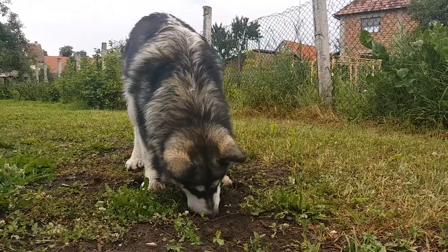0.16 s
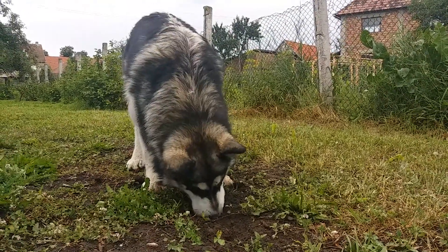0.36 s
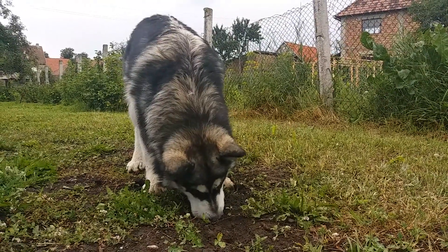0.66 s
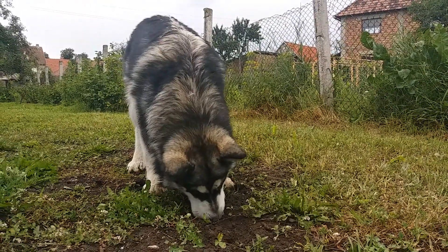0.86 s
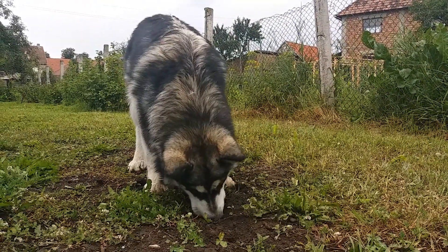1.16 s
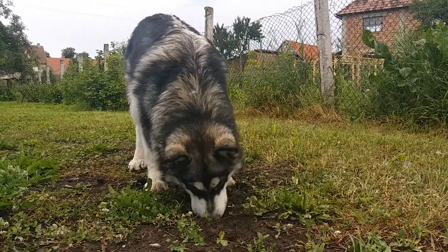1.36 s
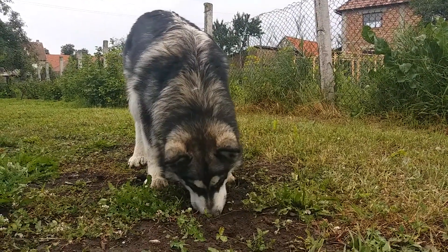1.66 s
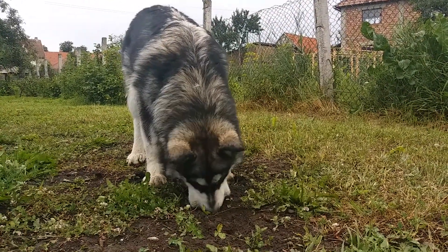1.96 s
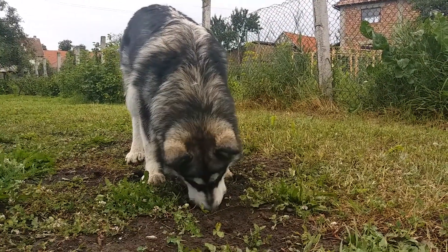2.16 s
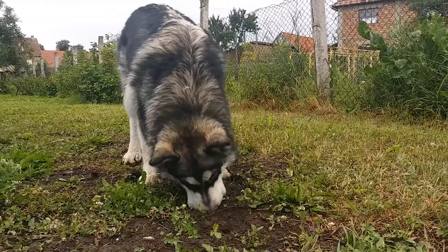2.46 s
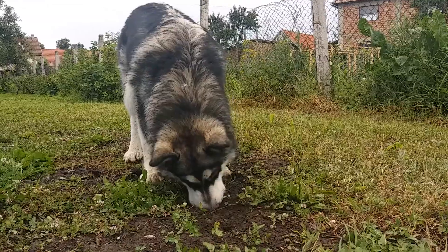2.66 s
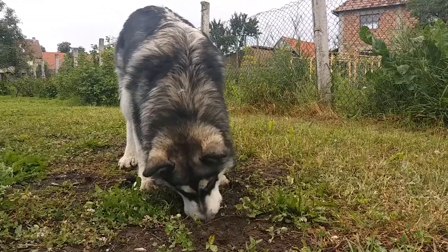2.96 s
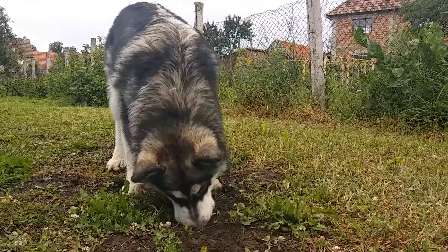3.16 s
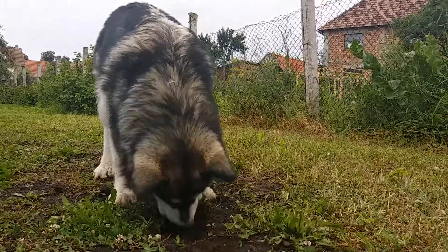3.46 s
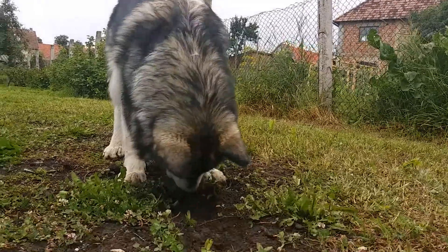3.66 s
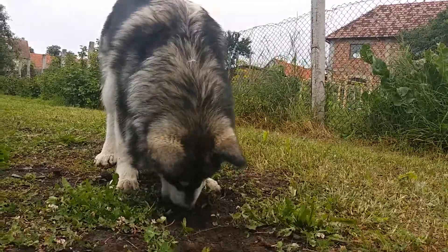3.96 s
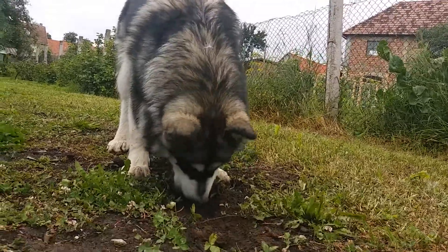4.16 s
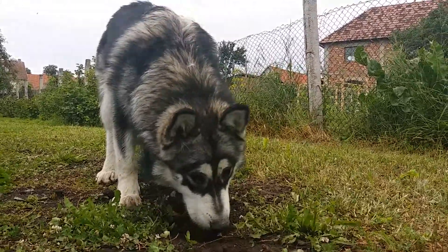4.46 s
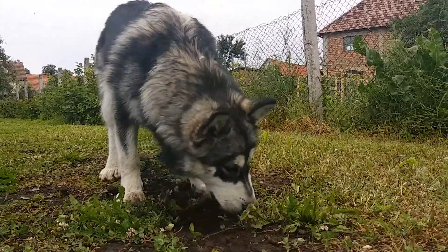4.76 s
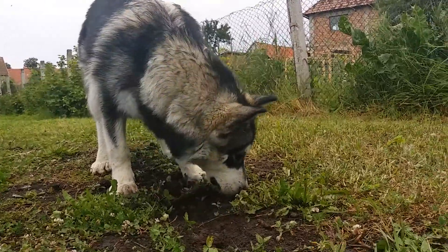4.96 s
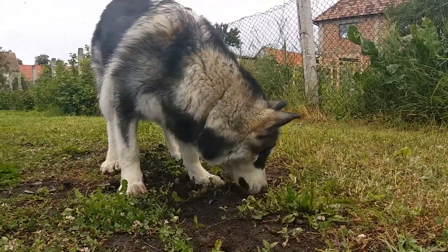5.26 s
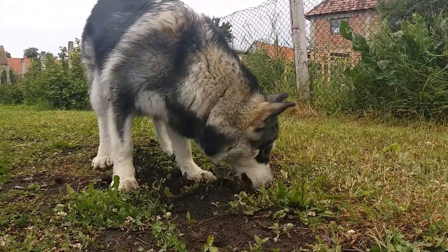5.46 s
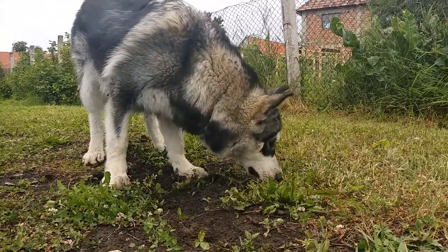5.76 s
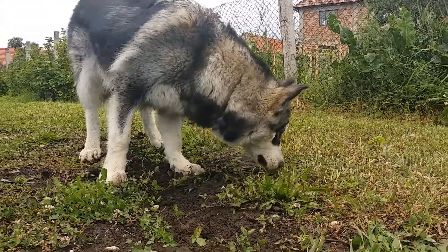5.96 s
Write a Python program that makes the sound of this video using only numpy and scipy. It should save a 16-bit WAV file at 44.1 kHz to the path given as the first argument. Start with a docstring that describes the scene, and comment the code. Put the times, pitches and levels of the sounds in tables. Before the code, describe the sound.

Very close stereo microphone in a yard as a dog sniffs in soil. Soft wide hiss and barely audible low puffs come first, then isolated dull thuds. From about three seconds, rapid bassy thuds buffet the left side, building to a loud, torn snort on the right that ends in a thin hiss. After a brief lull, irregular low thuds continue to the end, with faint dry ticks.

```python
"""Soft, wide hiss and low, churning air, then thuds and a loud rush: wind buffets two microphone ports.
Eddies cross the ports, pull and push the pressure into thuds and leave churning wakes, mostly on the left.
Gusts hit the right port as shaped noise with random crackle; the strongest, a loud rush, ends in a thin hiss.
Faint dry ticks are short sine clicks. The recorder turns down all but the bass when the scene falls quiet."""
import sys
import numpy as np
from scipy import signal
from scipy.fft import rfft, irfft, next_fast_len
from scipy.io import wavfile

SR = 44100
rng = np.random.default_rng(int(sys.argv[2]) if len(sys.argv) > 2 else 0)


def bounce(signal):
    """Save signal as a 16-bit WAV file at the path given by the first command-line argument."""
    frames = np.transpose(np.atleast_2d(signal))
    limited = np.clip(frames, -1, 1)
    pcm = np.round(limited * 32767).astype(np.int16)
    wavfile.write(sys.argv[1], SR, pcm)


N = 269451
TIME = np.arange(N) / SR

# Eddies passing a port. Each row: centre in seconds, relative strength in dB, passing time in ms,
# port (0 left, 1 right).
EDDIES = [(0.7148,-14,2.3,0),(0.95,-28,2.4,0),(1.012,-38,2,1),(1.393,-21.5,1.4,0),(1.527,-24,1.86,0),
          (1.55,-26.5,2.34,0),(1.668,-19.5,1.7,0),(1.7647,-15.5,3.67,1),(1.822,-28.5,3.5,0),(1.852,-28.5,3.4,0),(1.9759,-26.5,1.95,0),
          (2.166,-27,3.7,0),(2.326,-20,1.42,0),(2.393,-6.5,1.77,0),(2.57,-34,3.7,0),(2.642,-30,1.5,0),(2.659,-24,2.14,0),
          (2.802,-17,3.4,1),(2.8639,-2,2,0),(2.917,-20.5,1.3,0),(2.965,-5,2.06,0),
          (3.041,-6,2.08,0),(3.057,-11,2.2,0),(3.091,-9.5,1.78,0),(3.156,-15.5,1.7,0),
          (3.232,-5.5,2.13,0),(3.285,-13,1.41,0),(3.3186,-9,1.95,0),(3.368,-11.5,1.9,0),
          (3.458,-7,2.1,0),(3.513,-15,1.9,0),(3.5571,-8,2.7,0),(3.583,-20,1.5,0),
          (3.657,-11,2.04,0),(3.71,-18.5,1.55,0),(3.766,-14.5,1.6,0),
          (3.835,0.5,2.3,1),(3.856,-10,1,1),(3.8734,2,2.1,1),(3.895,-4.5,2.6,1),(3.907,-3,2.9,1),(3.95,-9,1.63,1),
          (3.985,-15.5,2.3,0),(4.015,-24,1.3,0),(4.079,-21,1.12,0),(4.126,-27.5,0.71,0),
          (4.201,-24,1.05,0),(4.286,-26,1.17,0),(4.457,-19,3.4,0),(4.487,-17,1.8,0),
          (4.519,-9,2.33,0),(4.534,-14.5,1.7,1),(4.563,-20,1.2,1),(4.588,-9,2.3,0),
          (4.637,-18,1.66,0),(4.697,-17,1.9,0),(4.712,-10.5,2.2,1),(4.7415,-10.5,2.15,0),
          (4.887,-4,2.74,0),(4.887,-13.5,4.9,1),(4.908,-11,1.74,0),(4.923,-14,1.2,1),(4.95,-6,2.3,0),
          (4.979,-9.5,7.2,1),(5.003,-19.5,2.1,0),(5.087,-9,2.25,0),(5.116,-16.5,1.86,0),(5.1605,-3,2.46,0),
          (5.162,-12,3.4,1),(5.206,-18.5,1.95,0),(5.257,-5,2.05,0),(5.297,-13,1.68,0),(5.336,-7,2.2,0),
          (5.369,-19,1.33,0),(5.395,-3.5,2.15,0),(5.4471,-10,1.67,0),(5.487,-9,2.9,0),
          (5.657,-2.5,2.1,0),(5.751,-8,2,0),(5.7586,-13.5,1.95,1),(5.777,-13,2.4,0),
          (5.89,-14.5,1.58,0),(5.938,-4.5,2,0),(6.022,-4,2.25,0),(6.06,-13,1.52,0)]
# Soft puffs of slow air at the left port. Each row: peak in seconds, relative level in dB, half length in seconds.
PUFFS = [(0.031,-45,0.014),(0.178,-49,0.039),(0.403,-54,0.067),(0.533,-47.5,0.062),(1.477,-52,0.015),(1.549,-36.5,0.03),
         (1.839,-45.5,0.039),(1.995,-42.5,0.034),(2.189,-44,0.087),(2.68,-36,0.022),(3.24,-33.5,0.023),(4.092,-34,.025),(4.344,-38,0.033),(4.77,-38,.015),(5.78,-36,0.035)]
# Churning air at each port, weak at first, stronger and uneven after about 2.9 s.
# Each row: time in seconds, relative level in dB.
LEFT_CHURN = [(0,-57),(.65,-64),(.85,-57.5),(1.25,-67.5),(1.5,-58),(2.55,-65),(3.0,-40),(3.95,-41),(4.2,-49.5),(4.42,-47),(4.5,-34),(4.82,-47),
              (4.98,-45),(5.55,-43),(6.1,-42.5)]
RIGHT_CHURN = [(0,-67.5),(1.3,-65),(1.6,-63.5),(2.62,-65.5),(2.88,-35),(2.98,-57),(3.08,-37),(3.18,-44.5),(3.6,-39),
               (4.08,-37),(4.25,-55.5),(4.36,-35),(4.75,-33),(4.83,-50),(4.9,-29.5),(5.25,-38.5),(6.1,-37)]
# Gusts of fast air at the right port. Each row: peak in seconds, relative roar level in dB, rise in seconds,
# fall in seconds, relative hiss level in dB.
GUSTS = [(3.28,-57,0.038,.05,-62.5),(3.399,-50,0.016,0.019,-59),(3.49,-38,0.036,0.076,-48.5),(3.56,-53,0.027,0.035,-57),(3.64,-48,0.049,0.028,-56),
         (3.749,-43,0.092,0.042,-53.5),(3.882,-20.5,0.058,0.037,-34.5),(3.955,-39.5,.015,0.017,-58),(4.01,-37.5,0.036,0.044,-59),(4.4,-52.5,0.037,0.011,-70),
         (4.555,-38.5,0.045,0.036,-52.5),(4.64,-54.5,0.01,0.023,-70),(4.71,-57,.012,0.018,-76),(4.93,-56,0.039,0.051,-70),(5.164,-57.5,0.014,0.017,-73),(5.56,-49.5,0.041,0.056,-65.5),(5.665,-59.5,.02,.03,-74.5),(5.787,-43.5,0.039,0.038,-59.5),(5.85,-58,0.026,0.062,-76)]
# Faint dry clicks. Each row: start in seconds, relative level in dB, pitch in Hz, port (0 left, 1 right).
TICKS = [(.042,-46,390,0),(.088,-50,800,0),(.491,-45,1380,0),(.894,-44,930,0),(3.443,-35,1000,1),
         (4.02,-39,13500,1),(4.124,-40,1100,0),(4.164,-43,1100,1),(4.552,-41.5,13600,1),(4.639,-44,1300,1),
         (4.695,-42,990,0),(4.859,-45,790,1),(4.92,-36,990,1),(4.977,-43,1300,0),(5.083,-41,970,0),(5.093,-40.5,1370,0),
         (5.114,-40.5,990,0),(5.204,-46,920,0),(5.296,-37,766,0),(5.368,-41,850,0),(5.403,-35.5,740,1),(6.058,-44.5,990,0)]
# The microphone's bass cut, which rings after each eddy. Each row: corner in Hz, quality factor (no unit).
BASS_CUT = [(75.5,2.04),(119.4,0.94)]
# Noise spectra of slow churn, fast churn, roar, gust hiss, jet and background hiss.
# Each row: frequency in Hz, relative level in dB per Hz.
CHURN_COLOUR = [(20,-50.5),(30,-26.5),(42,-6),(66,3.5),(100,0),(140,-7.5),(200,-22),(300,-21.5),(500,-39),(900,-41.5),(3000,-100)]
GUST_COLOUR = [(20,-52.5),(42,-25),(65,2.5),(100,6.5),(170,3.5),(230,-2),(320,-6),(550,-30),(1000,-50),(3000,-100)]
RUSH_COLOUR = [(30,-42),(170,-8.5),(300,3),(420,3),(600,-2),(1000,-8.5),(1600,-14),(2400,-29.5),(5000,-47.5),(8000,-79)]
FIZZ_COLOUR = [(300,-42),(1200,0),(1800,6),(2400,4),(3300,-1.5),(4700,-8.5),(6000,-18),(8000,-34.5),(10000,-26.5),(14000,-20),(16000,-18)]
JET_COLOUR = [(300,-40),(1400,1),(2400,7.5),(3400,0.5),(5000,-6.5),(6200,-16),(8000,-34),(11000,-23),(16000,-13)]
HISS_COLOUR = [(20,-29),(45,-12),(100,0),(250,7.5),(500,5),(1000,2.5),(2200,-.5),(4000,-6),(7000,-15.5),(8700,-16.5),(11000,-10.5),(14500,-5.5),(16000,-8)]

SIGN_FLIP_S = 4.35  # the pressure swings change sign from this time on
WAKE_DB, WAKE_S = -28.5, 0.014  # wake strength relative to its eddy, and time from wake start to peak
GUST_SHAPE = 1.076  # 1 = pointed peak, 2 = round
GUST_CHURN_DB = 9  # low buffeting relative to the roar
# The thin hiss that ends the strongest gust: its timing, then its resonance, which rises and sinks again.
JET_START_S, JET_RISE_S, JET_HOLD_S, JET_FALL_S = 3.995, 0.022, 0.067, 0.047
JET_HZ, JET_ARCH_HZ, JET_WIDTH_HZ = 1320, 970, 1300
EDGE_HZ = 15850  # upper band limit


def gain_of(db):
    """Decibels to amplitude."""
    return 10 ** (np.asarray(db) / 20)


def evened(x):
    """Scales to rms 1."""
    return x / np.sqrt(np.mean(x ** 2) + 1e-20)


def level(curve):
    """Gain of a (seconds, dB) curve at every sample."""
    seconds, db = np.transpose(curve)
    return gain_of(np.interp(TIME, seconds, db))


def swell(peak_s, rise_s, fall_s, shape):
    """Envelope that grows to 1 at its peak and dies away."""
    t = TIME - peak_s
    distance = abs(t / np.where(t < 0, rise_s, fall_s))
    return np.exp(-np.minimum(distance ** shape, 40))


def add(mix, start_s, sound):
    """Mixes a sound in at a time, in place."""
    start = max(round(start_s * SR), 0)
    part = mix[start:][:len(sound)]
    part += sound[:len(part)]


def coloured(x, colour):
    """Gives x a spectrum, at rms 1."""
    hz, db = np.transpose(colour)
    size = next_fast_len(N)
    log_bins = np.log(np.fft.rfftfreq(size, 1 / SR) + 1)
    gain = gain_of(np.interp(log_bins, np.log(hz), db))
    return evened(irfft(rfft(x, size) * gain, size)[:N])


def smoothed(x, seconds):
    """Running mean under a bell-shaped window."""
    bell = np.hanning(max(int(seconds * SR), 5))
    return signal.oaconvolve(x, bell / bell.sum(), "same")


def resonate(x, hz, width_hz):
    """A resonance that follows the curve hz: shift it down to zero, low-pass twice, shift it back."""
    turn = np.exp(2j * np.pi * np.cumsum(hz) / SR)
    r = np.exp(-np.pi * width_hz / SR)
    filtered = signal.lfilter([1], [1, -2 * r, r * r], x / turn)
    return (turn * filtered).real


def turbulence(colour, lumpy_db, lump_s, steady_s):
    """Noise that arrives in short lumps, while its power over longer spans holds steady."""
    wander = evened(smoothed(rng.standard_normal(N), lump_s))
    lumps = gain_of(lumpy_db * np.clip(wander, -2.5, 2.5))
    x = coloured(rng.standard_normal(N) * lumps, colour)
    return x / np.sqrt(smoothed(x ** 2, steady_s) + 1e-9)


def hiss(level_db=-64.0):
    """Soft, steady, wide background hiss: separate coloured noise at each port."""
    return gain_of(level_db) * np.array([coloured(rng.standard_normal(N), HISS_COLOUR) for port in range(2)])


def churn(strength, fast, trim_db):
    """Low buffeting at one port; a share of fast air breaks into smaller eddies and sounds higher."""
    rumble = turbulence(CHURN_COLOUR, lumpy_db=5.5, lump_s=0.017, steady_s=0.075)
    gust = turbulence(GUST_COLOUR, lumpy_db=1.5, lump_s=0.01, steady_s=0.06)
    blend = np.sqrt(1 - fast) * rumble + np.sqrt(fast) * gust  # the shares add in power
    return gain_of(trim_db) * strength * blend


def buffeting(roar, left_fast=0.033, wake_fast=0.3, slow_db=-62, fast_db=-44):
    """Drifting air, wakes, puffs and gusts churn at the ports; the air quickens in left wakes and right gusts."""
    left_wake, right_wake = wakes()
    gust_churn = gain_of(GUST_CHURN_DB) * roar
    # the sources add in power
    left = np.linalg.norm([level(LEFT_CHURN), left_wake, puffs()], axis=0)
    right = np.linalg.norm([level(RIGHT_CHURN), right_wake, gust_churn], axis=0)
    left_share = np.clip(left_fast + wake_fast * (left_wake / left) ** 2, 0, 1)
    right_share = np.interp(20 * np.log10(roar), [slow_db, fast_db], [0, 1])
    return np.array([churn(left, left_share, trim_db=-0.45), churn(right, right_share, trim_db=0.76)])


def puffs():
    """Strength of the slow air at the left port, one rounded swell for each puff."""
    return sum(gain_of(db) * swell(peak_s, half_s, half_s, 1.8) for peak_s, db, half_s in PUFFS)


def ticks(ring_cycles=0.35, shortest_s=0.0001, trim_db=0.5):
    """Tiny, nearly dead clicks: a sine with a soft front and a quick decay."""
    out = np.zeros((2, N))
    t = np.arange(SR // 100) / SR
    for start_s, db, hz, port in TICKS:
        age = t / max(ring_cycles / hz, shortest_s)
        envelope = age * np.exp(1 - age)
        add(out[round(port)], start_s, gain_of(db + trim_db) * np.sin(2 * np.pi * hz * t) * envelope)
    return out


def eddy_swing(u):
    """Pressure as an eddy crosses a port: a pull, then a push; u is time over passing time."""
    return u / (1 + u * u) ** 2


def eddies(trim_db=3.5, core_db=-35, core_size=0.18, core_lead=0.66):
    """Each eddy swings the pressure; a quick one sounds higher, and a small core sharpens its front."""
    out = np.zeros((2, N))
    t = np.arange(-SR // 20, SR // 20) / SR
    for centre_s, db, passing_ms, port in EDDIES:
        u = t * 1000 / passing_ms
        core = gain_of(core_db) * eddy_swing((u + core_lead) / core_size)
        sign = np.sign(SIGN_FLIP_S - centre_s)
        add(out[round(port)], centre_s + t[0], sign * gain_of(db + trim_db) * (eddy_swing(u) + core))
    return bass_cut(out)


def bass_cut(x):
    """Two resonant high-passes turn a pressure swing into a short, falling thud."""
    for hz, quality in BASS_CUT:
        w = 2 * np.pi * hz
        b, a = signal.bilinear([1, 0, 0], [1, w / quality, w * w], SR)
        x = signal.lfilter(b, a, x)
    return x


def wakes(lead_s=0.015, across_db=-9):
    """Strength of the churning around the eddies at each port; some of it reaches the other port."""
    out = np.zeros((2, N))
    t = np.arange(SR // 3) / SR
    envelope = t / WAKE_S * np.exp(1 - t / WAKE_S)
    for centre_s, db, _, port in EDDIES:
        add(out[round(port)], centre_s - lead_s, gain_of(db + WAKE_DB) * envelope)
    return out + gain_of(across_db) * out[::-1]


def gusts():
    """Strength of the roar and of the hiss at the right port; the gusts add in power."""
    power = np.zeros((2, N))
    for peak_s, roar_db, rise_s, fall_s, hiss_db in GUSTS:
        strength = gain_of([[roar_db], [hiss_db]]) * swell(peak_s, rise_s, fall_s, GUST_SHAPE)
        power += strength ** 2
    return np.sqrt(power)


def gust_rush(roar, spray, rush_db=5.0, fizz_db=3.5, left_db=-44, left_growth=0.35):
    """Fast air tears at the right port: a ragged roar with hiss on top. Only its edge brushes the left port."""
    rush = turbulence(RUSH_COLOUR, lumpy_db=3.0, lump_s=0.0054, steady_s=0.023)
    fizz = turbulence(FIZZ_COLOUR, lumpy_db=1.4, lump_s=0.0022, steady_s=0.38)
    edge = turbulence(RUSH_COLOUR, lumpy_db=1.5, lump_s=0.0025, steady_s=0.05)
    left = gain_of(left_db) * roar ** left_growth * edge  # grows more gently than the roar
    right = gain_of(rush_db) * roar * rush + gain_of(fizz_db) * spray * fizz
    return np.array([left, right])


def grit(roar, per_s=130, passing_ms=0.41, level_db=8, spread_db=3.5):
    """Tiny eddies break from each gust at random and make it crackle at the right port."""
    sizes = gain_of(spread_db * np.minimum(rng.exponential(1, N), 3))
    signs = np.sign(rng.standard_normal(N))
    train = sizes * signs * (rng.random(N) < per_s / SR)
    u = np.arange(-200, 201) / SR * 1000 / passing_ms
    crackle = signal.oaconvolve(train, eddy_swing(u), "same")
    return np.array([np.zeros(N), gain_of(level_db) * roar * crackle])


def jet_opening():
    """How far the narrow stream has formed, 0-1, and how far it has run, 0-1."""
    corners = JET_START_S + np.cumsum([0, JET_RISE_S, JET_HOLD_S, JET_FALL_S])
    opening = np.interp(TIME, corners, [0, 1, 1, 0])
    run = np.interp(TIME, [corners[0], corners[-1]], [0, 1])
    return opening, run


def jet(fizz_db=-45, ring_db=-47, body_db=-47, body_hz=380, body_width_hz=260):
    """A narrow stream of air hisses at the right port over a low body; its resonance follows one arch."""
    opening, run = jet_opening()
    arch_hz = JET_HZ + JET_ARCH_HZ * np.sin(np.pi * run)
    ring = evened(resonate(rng.standard_normal(N), arch_hz, JET_WIDTH_HZ))
    body = evened(resonate(rng.standard_normal(N), np.full(N, body_hz), body_width_hz))
    fizz = coloured(rng.standard_normal(N), JET_COLOUR)
    air = gain_of(fizz_db) * fizz + gain_of(ring_db) * ring + gain_of(body_db) * body
    return np.array([np.zeros(N), opening * air])


def scene(smooth_db=-9):
    """Everything at the two ports; the roar drops while the air runs in a narrow stream."""
    roar, spray = gusts()
    _, run = jet_opening()
    roar = roar * gain_of(smooth_db * np.sin(np.pi * run) ** 2)
    return hiss() + buffeting(roar) + ticks() + eddies() + gust_rush(roar, spray) + grit(roar) + jet()


def suppressor(x, quiet_db=-62, loud_db=-42, depth_db=-7, sense_s=0.039, follow_s=0.036, above_hz=250):
    """Turns down all but the bass while the sound is weak, and opens smoothly as it grows."""
    power = smoothed((x ** 2).mean(0), sense_s)
    power_db = 10 * np.log10(abs(power) + 1e-12)
    target = np.interp(power_db, [quiet_db, loud_db], [0, 1])
    r = np.exp(-1 / (follow_s * SR))
    opened = signal.lfilter([1 - r], [1, -r], target)
    bass = signal.sosfiltfilt(signal.butter(2, above_hz, fs=SR, output="sos"), x)
    return bass + gain_of(depth_db * (1 - opened)) * (x - bass)


def record(dry, ceiling=1.0):
    """Noise suppression; the strongest air is rounded off near full scale; then the band limit."""
    x = suppressor(dry)
    rounded = x / (1 + (x / ceiling) ** 4) ** (1 / 4)
    lowpass = signal.firwin(511, EDGE_HZ, window=("kaiser", 9), fs=SR)
    return signal.oaconvolve(rounded, lowpass[None], "same")


dry = scene()
out = record(dry)
bounce(out)
```